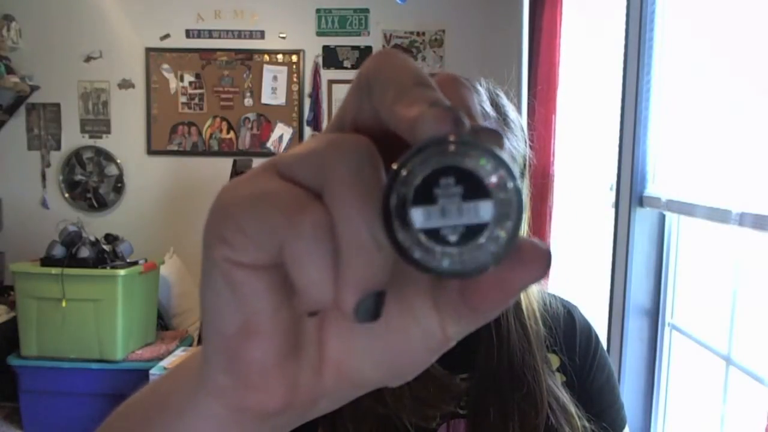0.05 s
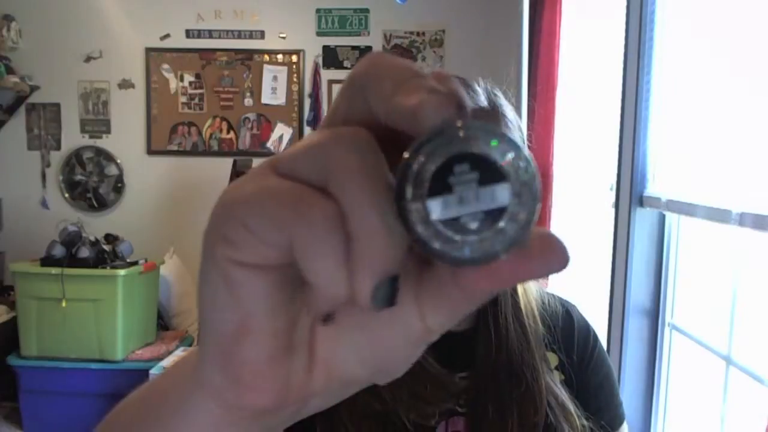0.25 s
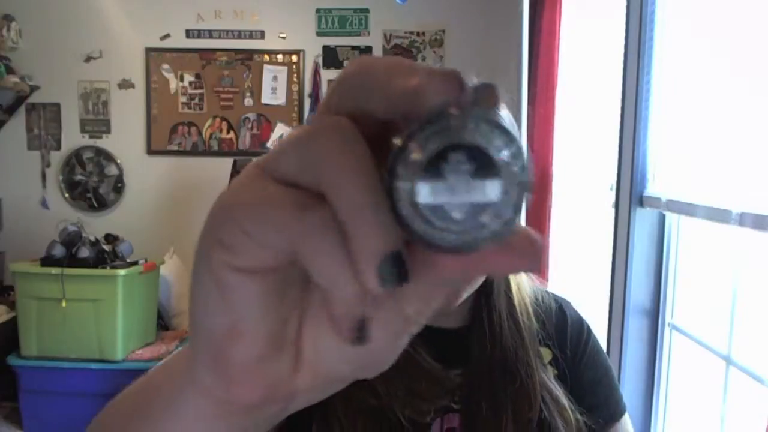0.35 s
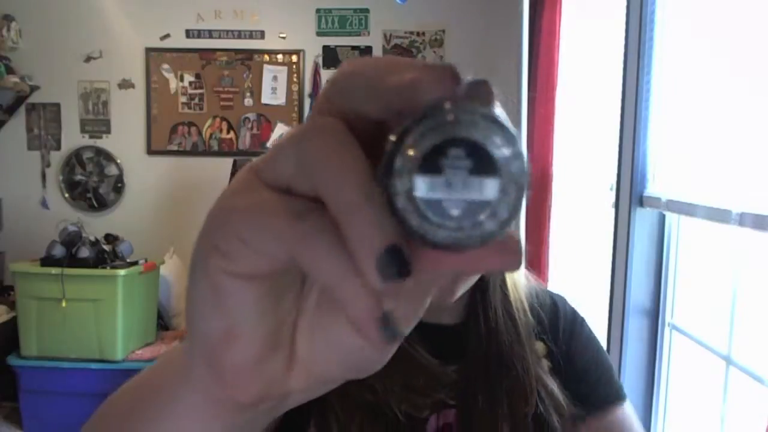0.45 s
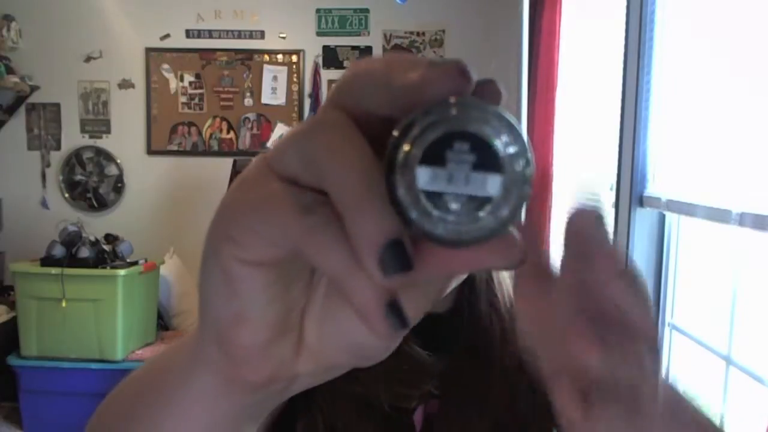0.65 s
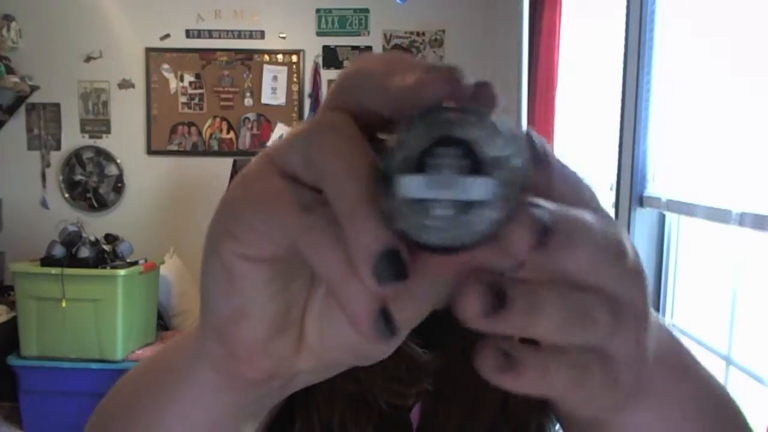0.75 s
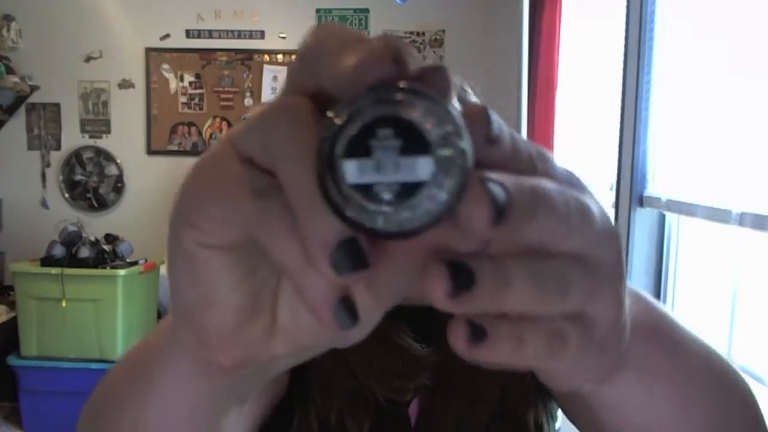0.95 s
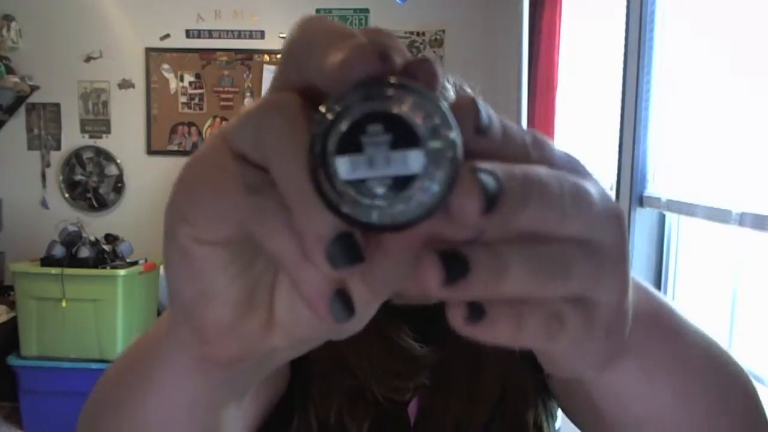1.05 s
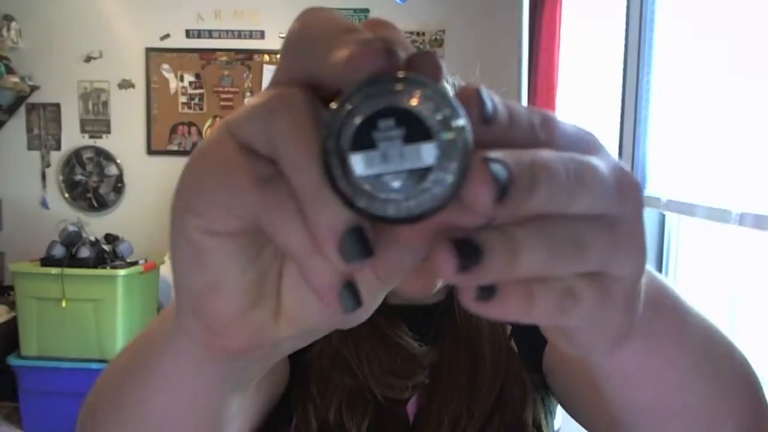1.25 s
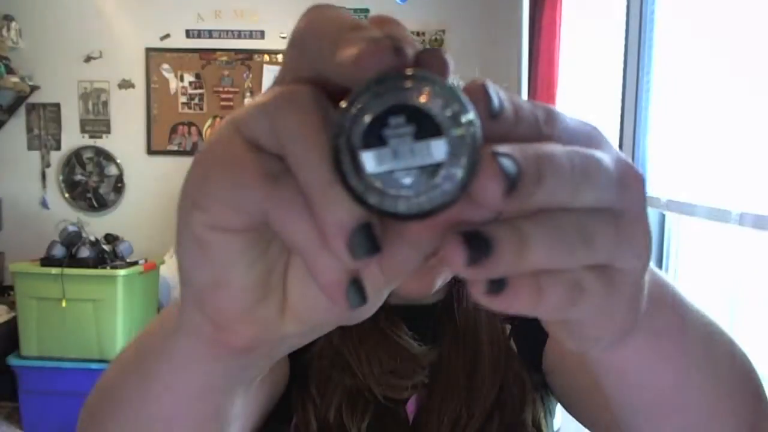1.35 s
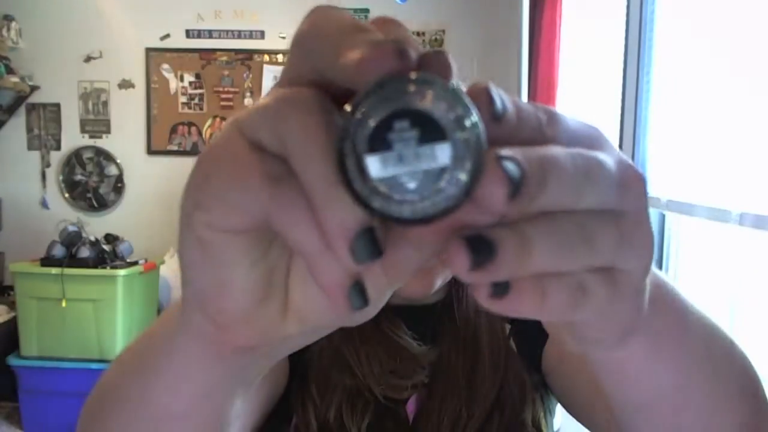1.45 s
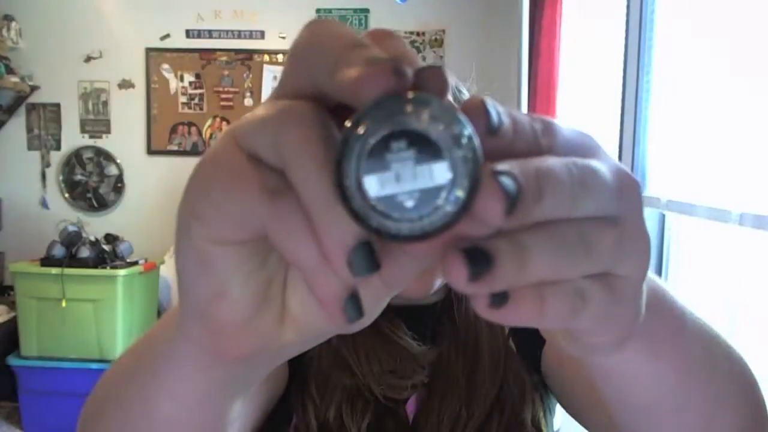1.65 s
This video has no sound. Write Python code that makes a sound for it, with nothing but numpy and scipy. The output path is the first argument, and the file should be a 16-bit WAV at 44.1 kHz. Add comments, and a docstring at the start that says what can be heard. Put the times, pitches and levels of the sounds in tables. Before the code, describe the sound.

One sharp clack of a small container on a desk, over faint room hiss.

```python
"""A small hard container clacks down near a desk microphone, over a bedroom's faint hum and hiss.
Each contact cracks and rings the rim with a tick; the hollow body knocks twice and settles.
The desk takes the blow, booms and keeps wobbling, while the room briefly echoes the tap.
A soft rustle, like a sleeve, passes and a faint high chirp follows."""
import sys
import numpy as np
from scipy import signal
from scipy.fft import rfft, irfft
from scipy.io import wavfile
from scipy.ndimage import uniform_filter1d

SR = 44100
rng = np.random.default_rng(int(sys.argv[2]) if len(sys.argv) > 2 else 0)


def bounce(signal):
    """Save signal as a 16-bit WAV file at the path given by the first command-line argument."""
    frames = np.transpose(np.atleast_2d(signal))
    limited = np.clip(frames, -1, 1)
    pcm = np.round(limited * 32767).astype(np.int16)
    wavfile.write(sys.argv[1], SR, pcm)


N = 74970

# each touch on the desk (time [s], tick gain [dB], knock gain [dB], push length [s])
CONTACTS = [(0.2466, -4, -30, .0001), (0.2485, -3, -5.4, .0001), (0.2514, -2, 3, .0001),
            (0.2572, 0, -11, .0001), (0.2608, -4, -6.5, .0001), (0.2679, -12, -12.5, .0001),
            (0.3145, -19, -30, .0016), (0.3185, -23, -11, .0016)]
# ringing tones of the hollow body and hard rim (pitch [Hz], relative level [dB], time to fade 60 dB [s])
BODY_TONES = [(272, -11.5, .12), (299, -22, .16), (412, -19, .1), (534, -4, .1), (599, -2.1, .045),
              (698, -1.5, .07), (785, -11.5, .1), (1000, -19, .075), (1090, -21, .08), (1328, -24, .07),
              (1430, -19, .07), (1907, -20, .046)]
RIM_TONES = [(2745, -8, .03), (3226, -8, .03), (4160, -4, .025), (4470, -1, .032), (4880, -1, .035),
             (5150, -2, .04), (5700, -4, .018), (6400, -5, .025)]
# tone colour of each noise (frequency [Hz], relative level [dB])
CRACK_COLOUR = [(300, -5.5), (1000, -13.5), (1800, -3.5), (3200, -9.5), (4200, -0.5), (5000, -0.5),
                (6200, 0), (8000, -5.5)]
SLEEVE_COLOUR = [(200, -3), (800, -11.5), (1500, -2.5), (2400, -5.5), (3600, -6.5), (5500, -2.5),
                 (8000, -8.5)]
ECHO_COLOUR = [(200, -5.5), (600, -17), (1200, -5.5), (3000, -3.5), (5000, -10.5), (8000, -1.5)]
RUMBLE_COLOUR = [(20, -4.5), (40, -2), (60, 4.5), (85, 5.5), (130, -2), (180, -10), (280, -17),
                 (450, -77.5)]
HISS_COLOUR = [(160, -38), (280, -8), (339, -2), (390, -5.5), (704, -8.5), (764, -9), (830, -7),
               (1170, -15.5), (5030, -23), (7500, -21.5), (9750, -81), (16500, -120)]
# path of the chirp (time [s], pitch [Hz], level [dB])
CHIRP_PATH = [(.89, 4950, -82), (.905, 5020, -71), (.92, 5250, -77), (.94, 5350, -65), (.96, 5330, -73),
              (1.03, 5050, -80)]
# tones of the mains hum (pitch [Hz], level [dB])
HUM_TONES = [(120, -47), (240, -65)]
# how alike the hiss is at both ears (frequency [Hz], likeness [0 to 1])
HISS_LIKENESS = [(200, 0), (500, 0.9), (1000, 0.4), (2000, 0.4), (4000, .07), (8000, 0.25)]

TIME = np.arange(N) / SR  # seconds
FREQUENCIES = np.arange(N // 2 + 1) * SR / N  # Hz
TOP_HZ = 7900  # where the microphone's treble stops
LOW_PAN_DB = 4  # desk, hum and rumble lean left


def container(body_db=-17.5, crack_db=-23, rim_db=-33):
    """Each contact is a gritty crack that rings the rim and a push that rings the hollow body."""
    body = ring(BODY_TONES, build_s=.0006)
    knocks, cracks = 0, 0
    for start_s, tick_db, knock_db, push_s in CONTACTS:
        crack = noise(CRACK_COLOUR) * fade(.0095)
        cracks += gain(crack_db + tick_db) * delay(crack, start_s)
        # a longer push smooths away the high tones
        knock = uniform_filter1d(delay(body, start_s), max(1, int(push_s * SR)))
        knocks += gain(body_db + knock_db) * knock
    ticks = cracks + gain(rim_db) * convolve(cracks, ring(RIM_TONES, build_s=.000067))
    stereo_ticks = np.array([ticks, delay(ticks, .00002)])  # the right ear hears them just later
    return pan(db=3) * knocks + pan(db=1.5) * stereo_ticks


def desk(start_s=.2515, start_hz=108, end_hz=54, sink_s=.014, rise_s=.0093):
    """The desk takes the blow: a thump that sinks in pitch into a long low wobble."""
    pitch = end_hz + (start_hz - end_hz) * np.exp(-TIME / sink_s)
    rise = 1 - np.exp(-(TIME / rise_s) ** 2)
    thump, wobble = fade(.1), gain(-12) * fade(1.28)
    boom = -rise * (thump + wobble) * tone(pitch)
    return pan(LOW_PAN_DB) * gain(-21) * delay(boom, start_s)


def sleeve(peak_s=.469, rise_s=.066, fall_s=.26):
    """Brushing cloth swells and dies away as the arm lifts."""
    from_peak = TIME - peak_s
    swell = np.exp(np.minimum(from_peak, 0) / rise_s - np.maximum(from_peak, 0) / fall_s)
    return gain(-55.5) * swell * stereo_noise(SLEEVE_COLOUR)


def chirp(waver_hz=70):
    """A thin, unsteady whistle rises and falls in pitch."""
    times, hz, db = np.array(CHIRP_PATH).T
    waver = waver_hz * noise([(100, 6), (300, -18), (1000, -51)])
    pitch = np.interp(TIME, times, hz) + waver
    level_db = np.interp(TIME, times, db, left=-140, right=-140)
    return np.sqrt(2) * gain(level_db) * tone(pitch)


def bedroom(sound):
    """Adds quick echoes from nearby surfaces and a short soft tail, different at each ear."""
    def echo(db, fade_s):
        burst = noise(ECHO_COLOUR) * fade(fade_s) * (1 - fade(.0072))
        strength = np.sqrt(np.sum(burst ** 2) * SR / (2 * TOP_HZ))
        return gain(db) * burst / strength
    echoes = [convolve(side, echo(db=-2.5, fade_s=.057) + echo(db=-10.5, fade_s=.41)) for side in sound]
    return sound + np.array(echoes)


def mains_hum(waver_db=.7):
    """Mains power hums in two low tones that waver slightly in level."""
    hum = 0
    for hz, db in HUM_TONES:
        waver = waver_db * noise([(5, 6.5), (15, -14.5), (60, -89)])
        wave = np.sqrt(2) * np.sin(2 * np.pi * (hz * TIME + rng.random()))
        hum += gain(db + waver) * wave
    return pan(LOW_PAN_DB) * hum


def room_noise(rumble_db=-52.5, hiss_db=-57):
    """The room rumbles and hisses; part of the hiss reaches both ears, part differs at each."""
    alike = np.clip(by_frequency(HISS_LIKENESS), 0, 1)
    shared = gain(hiss_db) * shape(noise(HISS_COLOUR), np.sqrt(alike))
    apart = gain(hiss_db) * shape(stereo_noise(HISS_COLOUR), np.sqrt(1 - alike))
    rumble = gain(rumble_db) * noise(RUMBLE_COLOUR)
    return pan(LOW_PAN_DB) * (rumble + shared) + apart


def gain(db):
    """Turns decibels into a multiplier."""
    return 10 ** (np.asarray(db) / 20)


def pan(db):
    """Left and right multipliers that make the left louder by db."""
    return gain(np.array([[db], [-db]]) / 2)


def by_frequency(points):
    """Joins (frequency [Hz], value) points into a curve."""
    hz, value = np.array(points, float).T
    return np.interp(np.log(FREQUENCIES + 1), np.log(hz), value)


def shape(sound, curve):
    """Turns each frequency up or down along a curve."""
    return irfft(rfft(sound) * curve, N)


def noise(colour):
    """Noise of strength 1, coloured by (frequency [Hz], relative level [dB]) points."""
    in_range = FREQUENCIES < TOP_HZ * 9 / 8
    coloured = shape(rng.standard_normal(N), gain(by_frequency(colour)) * in_range)
    return coloured / coloured.std()


def stereo_noise(colour):
    """A separate noise for each ear."""
    return np.array([noise(colour), noise(colour)])


def tone(hz):
    """A pure tone that follows a changing pitch."""
    return np.sin(2 * np.pi * np.cumsum(hz) / SR)


def fade(seconds):
    """Starts at 1 and drops 60 dB in the given time."""
    return np.exp(-np.log(1000) * TIME / seconds)


def ring(tones, build_s):
    """A struck object's tones build up during the contact, then die away."""
    ringing = sum(gain(db) * fade(fade_s) * np.cos(2 * np.pi * hz * TIME) for hz, db, fade_s in tones)
    return (1 - np.exp(-TIME / build_s)) * ringing


def delay(sound, seconds):
    """The same sound, later."""
    return np.interp(TIME - seconds, TIME, sound, left=0)


def convolve(sound, response):
    """Lets every instant of a sound set off a ring or an echo."""
    return signal.fftconvolve(sound, response)[:N]


def scene():
    """The tap in its room, with the quiet sounds around it."""
    return bedroom(container()) + desk() + sleeve() + chirp() + mains_hum() + room_noise()


def record(dry):
    """The microphone softens the treble, then cuts it off."""
    soften = signal.butter(6, 5950, fs=SR, output="sos")
    cut_off = signal.ellip(10, .2, 80, TOP_HZ, fs=SR, output="sos")
    return signal.sosfilt(cut_off, signal.sosfilt(soften, dry))


dry = scene()
out = record(dry)
bounce(out)
```